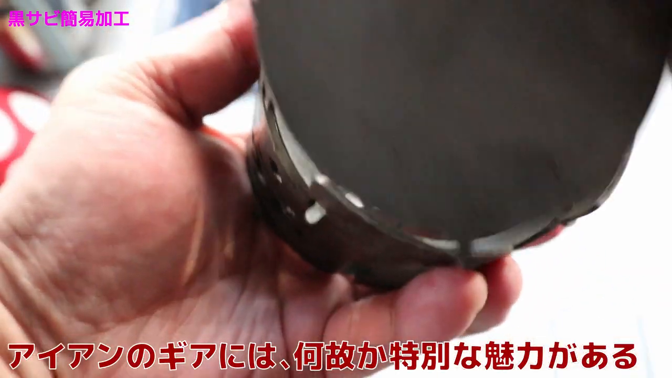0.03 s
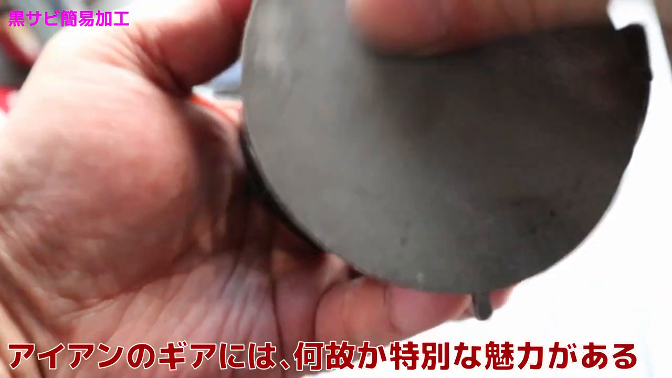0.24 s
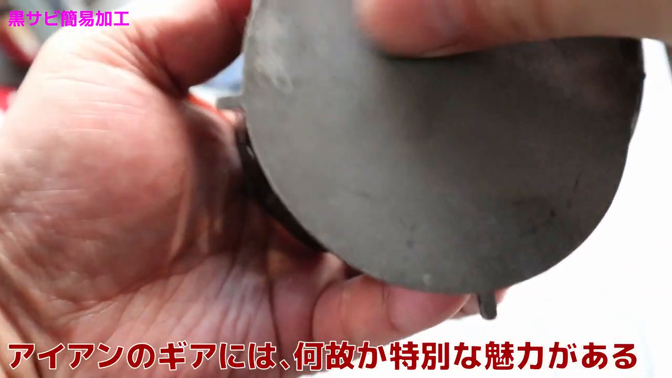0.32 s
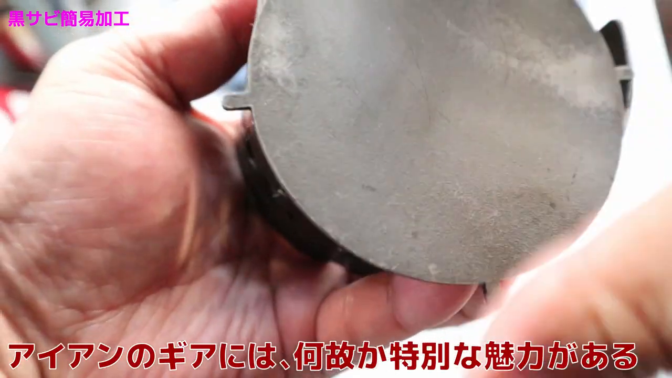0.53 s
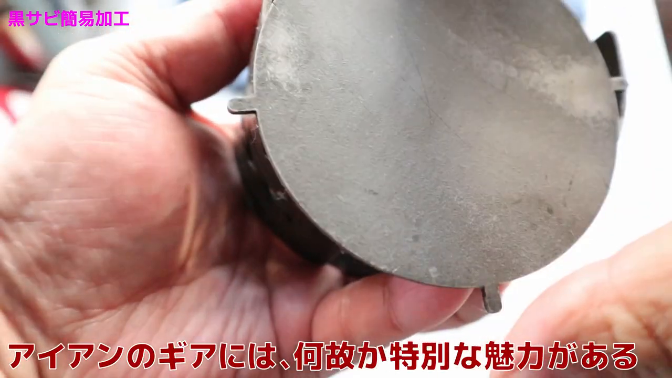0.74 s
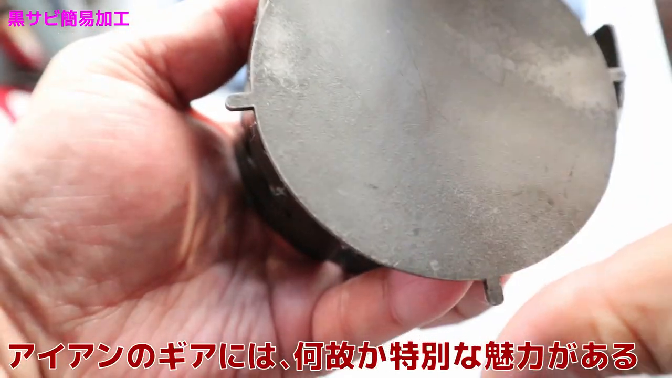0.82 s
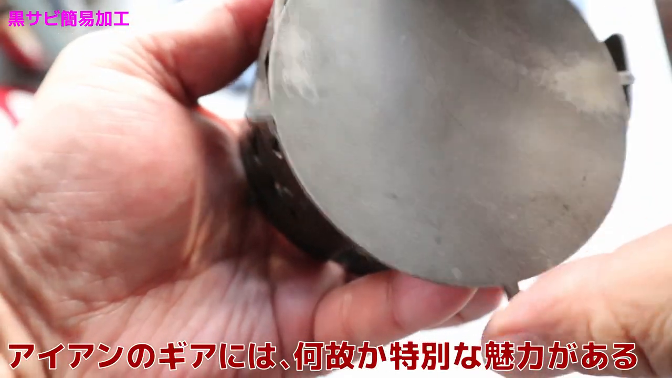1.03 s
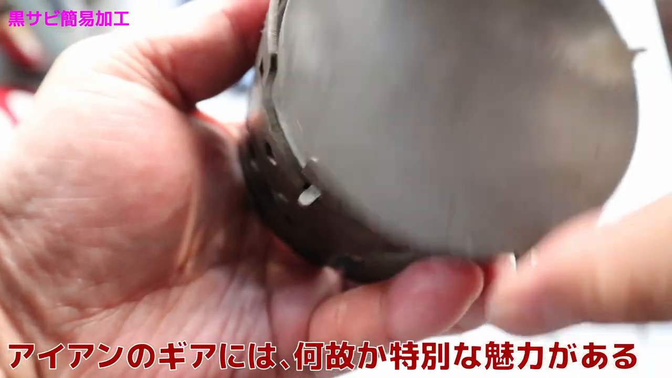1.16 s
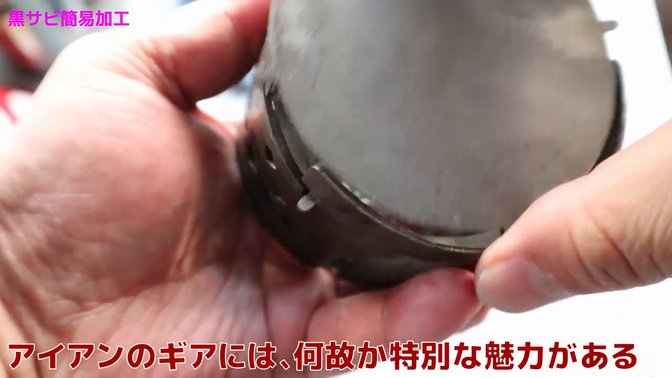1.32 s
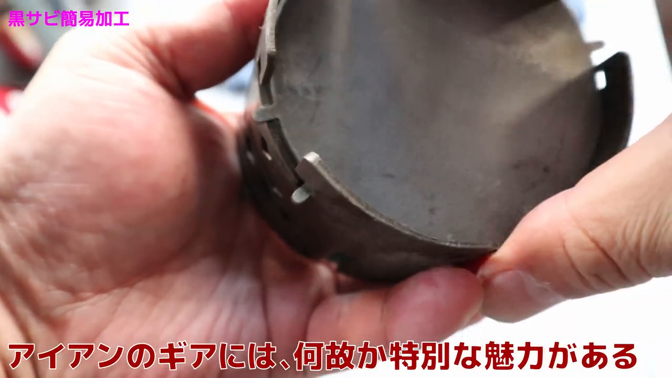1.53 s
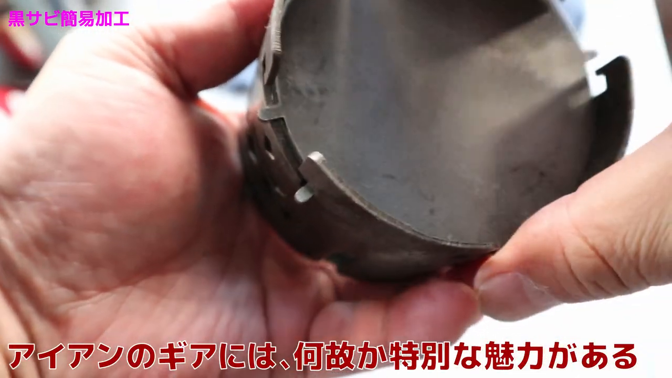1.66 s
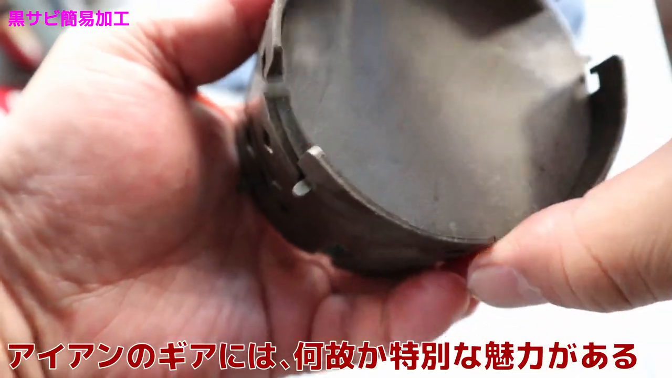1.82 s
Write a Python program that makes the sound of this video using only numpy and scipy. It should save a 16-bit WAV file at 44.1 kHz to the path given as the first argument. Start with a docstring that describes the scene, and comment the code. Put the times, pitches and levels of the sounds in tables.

```python
"""In a small, quiet room, a thin round iron plate is laid on a small iron cup held in the hand,
then pushed until it drops into its seat. Each knock rings the plate's modes and clacks the damped cup wall;
scrapes drive the same two bodies with runs of tiny slips. Caught tabs ping, a rub squeaks, a faint tone swells.
A short diffuse tail and a low noise floor surround them; the loudest knocks overload the close microphone,
mostly on the right."""
import sys
import numpy as np
from scipy import signal
from scipy.fft import rfft, irfft
from scipy.io import wavfile
from scipy.ndimage import uniform_filter1d

SR = 44100
rng = np.random.default_rng(int(sys.argv[2]) if len(sys.argv) > 2 else 0)


def pcm_store(signal):
    """Save signal as 16-bit PCM."""
    levels = np.round(np.clip(np.atleast_2d(signal), -1, 1) * 32767)
    wavfile.write(sys.argv[1], SR, levels.astype(np.int16).T)


N = 81585
RING_T = np.arange(SR // 2) / SR  # time axis of one contact, s


def amp(db):
    """Turns dB into a linear factor."""
    return 10 ** (np.asarray(db) / 20)


def decay(t, t60):
    """Exponential fade that falls 60 dB in t60 seconds."""
    return np.exp(-np.log(1000) * t / t60)


def read(points, hz):
    """Joins (Hz, value) points on a log-frequency axis."""
    point_hz, value = np.transpose(points)
    return np.interp(np.log(hz + 1), np.log(point_hz), value)


def add(mix, start, sound):
    """Mixes a stereo sound in at start seconds."""
    first = max(round(start * SR), 0)
    part = mix[:, first:][:, :sound.shape[1]]
    part += sound[:, :part.shape[1]]


def noise_pair(size, likeness):
    """Left and right noise that are partly alike: 0 is unrelated, 1 is identical."""
    other, right = rng.standard_normal((2, size))
    shared = np.clip(likeness, 0, 1)
    left = shared * right + np.sqrt(1 - shared ** 2) * other
    return np.array([left, right])


def colour(x, db_of):
    """Causal minimum-phase filter with the gain db_of(Hz)."""
    hz = abs(np.fft.fftfreq(2048, 1 / SR))
    log_gain = np.log(amp(db_of(hz)))
    taps = np.fft.ifft(np.exp(np.conj(signal.hilbert(log_gain)))).real
    return signal.fftconvolve(x, taps)[:len(x)]


# Contacts of plate and cup. Each row: start in seconds, wall clack in dB, treble tilt in dB per octave,
# plate's lowest mode in dB, plate's overtones in dB, ring length as a factor.
KNOCK_HITS = [ (0.0159, -44, 3, -34, -47, 1.9), (0.1998, -3.5, -1.5, 6, -7, 0.55),
              (0.211, -10.5, -4.5, -19, -33.5, 3.5), (.2781, -21.5, -5, -19, -40, 0.69),
              (.302, -18, -8, -8.5, -23, 0.75), (.3060, 4, 1, -4, -5.5, 0.47),
              (0.3094, -2.5, 4.5, -3.5, 2.5, 0.16), (0.3135, -1, 2.5, -5, -5.5, 0.21),
              (0.367, -43, 0.5, -39, -27, 0.6), (0.6154, -39.5, -12, -54, -70.5, 0.3),
              (0.6601, -20.5, -2.5, -36.5, -32.5, 0.77), (0.744, -30.5, -7, -56, -53.5, 0.35),
              (0.8979, -11, -1.5, -13.5, -28, 0.28), (0.909, -11.5, 1, -7, -17, 0.18),
              (0.9144, -14, 3.5, -29, -17, 0.85), (1.028, -32, -7, -52, -67.5, 0.24),
              (1.0911, -27, -4.5, -39, -49.5, 0.7), (1.1277, -24.5, -4, -29.5, -43, 0.54),
              (1.139, -33, -3.5, -47, -32.5, 2.7), (1.3259, -29.5, -0.5, -20.5, -31.5, 1.2),
              (1.366, -23, -10.5, -44, -47, 0.46), (1.4255, -24.5, 3, -13.5, -26, 0.43),
              (1.437, -12.5, -4.5, -18, -31, 0.96), (1.4755, -3.5, 4, 2.5, -3.5, 0.78),
              (1.4853, -5, 1, -9, -35, 0.14), (1.502, -13, 3.5, -9.5, -10.5, 0.54),
              (1.508, -14, -1.5, -22, -14.5, 1.22), (1.574, -28, -3, -24, -47, 0.6),
              (1.670, -24, -9, -26, -47, 0.91), (1.7641, -30.5, -12, -51, -43, 0.57),
              (1.8462, -28, -5, -30, -42, .5)]
# The thumb presses the plate. Each row: time in seconds, rise of the plate's pitch in percent.
THUMB_PRESSURE = [(.4, 0), (.66, 1.4), (.91, 3), (1.1, 0)]


def knocks():
    """Every contact excites plate and wall together; thumb pressure sharpens the plate."""
    out = np.zeros((2, N))
    press_s, press_percent = np.transpose(THUMB_PRESSURE)
    for start, wall_db, tilt_db, low_db, high_db, ring in KNOCK_HITS:
        sharp_percent = np.interp(start, press_s, press_percent)
        body = wall(wall_db, tilt_db, ring) + plate(low_db, high_db, ring, sharp_percent, tilt_db)
        add(out, start, body)
    return out


# Modes of the flat plate. Each row: pitch in Hz before pressure, relative level in dB,
# t60 in seconds before the ring factor, left minus right in dB, phase lead of the left in radians.
PLATE_MODES = [(2384, 0, 0.098, -8.5, 0.77), (5453, -1.5, 0.118, -8, -1.1), (5925, -25, 0.2, -5.5, 0.19),
               (8737, -15.5, 0.15, -6, 2.3), (9504, -21, 0.16, -7.5, 0.33), (10150, -17, 0.09, -8.5, 2.3),
               (11924, -26.5, .09, -5, 0), (13620, -31, 0.08, -2, -0.32)]


def plate(low_db, high_db, ring, sharp_percent, tilt_db):
    """The flat plate rings clearly; contact shortens the ring and pressure sharpens it."""
    out = np.zeros((2, len(RING_T)))
    for k, (hz, db, t60, left_db, lead) in enumerate(PLATE_MODES):
        turn = 2 * np.pi * hz * (1 + sharp_percent / 100) * RING_T
        # only soft contacts dull the overtones
        level_db = low_db if k == 0 else high_db + treble(hz / 2, 2 * min(tilt_db, 0))
        fade = amp(db + level_db) * decay(RING_T, t60 * max(ring, .1))
        tone = flutter(hz, ring) * np.exp(1j * turn)
        left = amp(left_db) * tone * np.exp(1j * lead)
        out += fade * np.array([left, tone]).imag
    return out


FLUTTER_PER_S = 90  # the random waver is averaged over 1/90 s
FLUTTER_FULL_HZ = 13000  # with a ring factor of 1, modes from here up waver fully


def flutter(hz, ring):
    """Uneven strength and phase of a mode as the plate chatters on the rim, less when it rings freely."""
    noise = rng.standard_normal((2, len(RING_T)))
    a, b = uniform_filter1d(noise, round(SR / FLUTTER_PER_S))
    waver = (a + 1j * b) / np.hypot(a.std(), b.std())
    share = min((hz / FLUTTER_FULL_HZ) ** 2 / abs(ring), 1)
    return np.sqrt(1 - share ** 2) + share * waver


# Modes of the cup's curved wall. Each row: pitch in Hz before the grip's detuning,
# relative level in dB before its random spread, t60 in seconds before the ring factor.
WALL_MODES = [(1497.5, -16, 0.089), (1638, -12.5, 0.086), (1800, -11, 0.055), (1970, -16, 0.14),
              (2095, -16, 0.08), (2290, -13, 0.054), (2497, -14, 0.072), (2630, -24.5, .07),
              (3090, -19.5, 0.062), (4060, -25.5, 0.06), (8860, -24.5, 0.06), (10120, -25.5, 0.058)]
# Colour of the dry clack of iron on iron. Each row: frequency in Hz, relative level in dB per Hz.
CLACK_COLOUR = [(40, -30), (150, -13.5), (350, -2.5), (620, -5), (900, 0.5), (1330, -9.5), (1680, 2),
                (2500, 2), (3300, -5.5), (5600, -11), (7900, -16), (9500, -14), (11200, -24.5),
                (15000, -33.5)]
# Stereo balance. Each row: frequency in Hz, left minus right in dB.
LEFT_BALANCE = [(100, 1.5), (400, -1.5), (1000, -5.5), (2500, -11.5), (4200, 0.5), (9000, -5),
                (13000, -6.5)]
CLACK_DB, CLACK_T60_S, CLACK_LIKENESS = 14.5, .006, 0.93
CLACK_TAIL_DB, CLACK_TAIL_T60_S = -15.5, 0.13  # tail against the burst; t60 before the ring factor
WALL_SPREAD_DB, GRIP_DETUNE, WALL_RISE_S = 4.5, .009, .0006  # dB and share of pitch, both standard deviations


def wall(level_db, tilt_db, ring):
    """A dry clack and the short, crowded modes of the cup, which shift with the grip."""
    free = np.sqrt(np.clip(ring, .1, 1))
    clack_tail = amp(CLACK_TAIL_DB) * decay(RING_T, CLACK_TAIL_T60_S * free)
    clack_fade = decay(RING_T, CLACK_T60_S) + clack_tail
    burst = noise_pair(len(RING_T), CLACK_LIKENESS) * clack_fade
    burst *= amp(CLACK_DB) * 2 / np.linalg.norm(burst[1])
    out = np.array([colour(side, lambda hz: read(CLACK_COLOUR, hz)) for side in burst])

    grips = rng.standard_normal((len(WALL_MODES), 4))
    for (hz, db, t60), (size, shift, lead, sign) in zip(WALL_MODES, grips):
        turn = 2 * np.pi * hz * (1 + GRIP_DETUNE * shift) * RING_T
        envelope = (1 - np.exp(-RING_T / WALL_RISE_S)) * decay(RING_T, t60 * free)
        level = np.sign(sign) * amp(db + WALL_SPREAD_DB * size)
        out += level * envelope * np.sin([turn + .5 * lead, turn])

    def right_db(hz):
        return level_db + treble(hz, tilt_db)

    def left_db(hz):
        return right_db(hz) + read(LEFT_BALANCE, hz)

    return np.array([colour(out[0], left_db), colour(out[1], right_db)])


SOFT_BODY_SHARE, BODY_HZ = 0.26, 550  # below the pivot the tilt has this share of its slope, down to 550 Hz


def treble(hz, tilt_db):
    """Soft contacts (negative tilt) excite less of the treble and more of the body; hard ones the reverse."""
    octaves = np.log2(np.maximum(hz, BODY_HZ) / 2200)  # distance from the pivot
    return tilt_db * np.maximum(octaves, SOFT_BODY_SHARE * octaves)


# Rubs of edge on edge. Each row: start in seconds, length in seconds, wall clack in dB,
# treble tilt in dB per octave, plate's lowest mode in dB, plate's overtones in dB.
SCRAPE_RUBS = [ (0.28, 0.018, -18.5, -2, -25, -35), (.307, 0.015, -9, 3, -17, -17.5),
               (1.037, 0.018, -35.5, -8, -55, -62), (1.083, 0.037, -31, -5.5, -46, -43),
               (1.119, 0.03, -30, -3.5, -38, -42), (1.373, 0.048, -29.5, -3.5, -51, -47),
               (1.415, 0.0256, -21.5, -1, -21.5, -32.5), (1.576, 0.028, -34, -3.5, -34, -46),
               (1.67, 0.031, -24, 1, -24, -40), (1.759, 0.06, -37, -5.5, -51, -63)]
SLIPS_PER_S, SLIP_SPREAD_DB = 900, 1.5  # average rate, standard deviation
SCRAPE_EDGE_DB = -3.5  # slips at both ends of a rub against its middle


def scrapes(ring=0.39):
    """Edge slides on edge: a run of uneven slips into the same two bodies."""
    out = np.zeros((2, N))
    for start, length, wall_db, tilt_db, low_db, high_db in SCRAPE_RUBS:
        chance, size = rng.random(len(RING_T)), rng.standard_normal(len(RING_T))
        slips = (chance < SLIPS_PER_S / SR) * (RING_T < length) * amp(SLIP_SPREAD_DB * size)
        progress = np.minimum(RING_T / length, 1)
        slips *= amp(SCRAPE_EDGE_DB * (2 * progress - 1) ** 2)
        # equal energy for every run of the same length
        slips *= np.sqrt(length * SLIPS_PER_S) / 2 / (np.linalg.norm(slips) + 1e-9)
        body = wall(wall_db, tilt_db, ring) + plate(low_db, high_db, ring, 0, tilt_db)
        add(out, start, signal.fftconvolve(slips[None], body, axes=1))
    return out


# Short pings where the rim or one of its tabs catches.
# Each row: start in seconds, pitch in Hz, level in dB, t60 in seconds.
TAB_PINGS = [(.115, 3140, -50.5, 0.079), (.309, 1587, -13, 0.12), (0.6609, 1800, -22.5, .04),
             (0.6609, 2665, -29, 0.056), (.808, 1940, -42.5, 0.057), (.898, 2950, -19, 0.07),
             (1.092, 875, -32.5, 0.041), (1.140, 2078, -30, 0.13), (1.508, 2000, -10.5, 0.054),
             (1.672, 1600, -26.5, .06), (1.8462, 3430, -33, 0.035)]


def tabs():
    """A caught rim or tab gives one short, decaying ping."""
    out = np.zeros((2, N))
    for start, hz, db, t60 in TAB_PINGS:
        ping = decay(RING_T, t60) * np.sin(2 * np.pi * hz * RING_T)
        add(out, start, amp([[db + read(LEFT_BALANCE, hz)], [db]]) * ping)
    return out


SQUEAK_S, SQUEAK_LENGTH_S, SQUEAK_DB = 1.686, .028, -28
SQUEAK_FROM_HZ, SQUEAK_TO_HZ = 2380, 2660


def squeak():
    """A late rub squeaks upward as the plate wedges tight."""
    out = np.zeros((2, N))
    progress = np.linspace(0, 1, round(SQUEAK_LENGTH_S * SR))
    hz = SQUEAK_FROM_HZ + (SQUEAK_TO_HZ - SQUEAK_FROM_HZ) * progress
    swell = amp(SQUEAK_DB) * np.sin(np.pi * progress)
    tone = swell * np.sin(2 * np.pi * np.cumsum(hz) / SR)
    add(out, SQUEAK_S, np.array([amp(read(LEFT_BALANCE, hz)) * tone, tone]))
    return out


SING_HZ, SING_START_S, SING_PEAK_S = 3317, 1.14, 1.385
SING_DB, SING_RISE_DB, SING_T60_S = -49, 16, .4  # level at the peak, rise up to it, fade after it


def singing():
    """One faint plate tone swells while the plate slides toward its seat, then fades."""
    t = np.arange(N) / SR
    rise = np.minimum((t - SING_PEAK_S) / (SING_PEAK_S - SING_START_S), 0)
    fade = decay(np.maximum(t - SING_PEAK_S, 0), SING_T60_S)
    envelope = amp(SING_DB) * (t > SING_START_S) * amp(SING_RISE_DB * rise) * fade
    tone = envelope * np.sin(2 * np.pi * SING_HZ * t)
    return tone * amp([[-8], [0]])  # left, right in dB


# Decay of the room. Each row: frequency in Hz, t60 in seconds.
ROOM_DECAY = [(150, .25), (600, 0.32), (2000, 0.23), (5000, 0.24), (10000, 0.24), (15000, 0.13)]
ROOM_DB, ROOM_DELAY_S = -11.5, 0.0037


def room(x):
    """A short diffuse tail of decaying noise whose highest treble dies first."""
    hz, t, bands = signal.stft(rng.standard_normal((2, SR // 2)), SR, nperseg=256)
    bands = bands * decay(t, read(ROOM_DECAY, hz)[:, None])
    tail = signal.istft(bands, SR, nperseg=256)[1]
    tail[:, :round(ROOM_DELAY_S * SR)] = 0
    tail /= np.linalg.norm(tail, axis=1, keepdims=True)
    mono = x.mean(0)[None]
    return amp(ROOM_DB) * signal.fftconvolve(mono, tail, axes=1)[:, :N]


# Colour of the room noise. Each row: frequency in Hz, relative level in dB per Hz.
FLOOR_COLOUR = [(15, -34), (25, -2), (181, -6.5), (301, -6.5), (573, -14.5), (2500, -25), (3300, -30.5),
                (8780, -39.5), (15000, -78.5)]
FLOOR_DB, FLOOR_LIKENESS = -52, 0.63  # RMS level, left-right likeness


def floor():
    """Low, steady room noise, shaped from white noise."""
    gain = amp(read(FLOOR_COLOUR, np.fft.rfftfreq(N, 1 / SR)))
    noise = irfft(rfft(noise_pair(N, FLOOR_LIKENESS)) * gain, N)
    return amp(FLOOR_DB) * noise / noise.std()


def scene():
    """Iron close by, in a quiet room."""
    iron = knocks() + tabs() + scrapes() + squeak() + singing()
    return iron + room(iron) + floor()


EDGE_HZ = 15900  # top of the band


def record(dry):
    """The input overloads toward full scale; then a low-pass limits the band."""
    clipped = dry / (1 + dry ** 8) ** (1 / 8)
    lowpass = signal.firwin(255, EDGE_HZ, window=("kaiser", 8), fs=SR)
    return signal.oaconvolve(clipped, lowpass[None], "same")


dry = scene()
out = record(dry)
pcm_store(out)
```